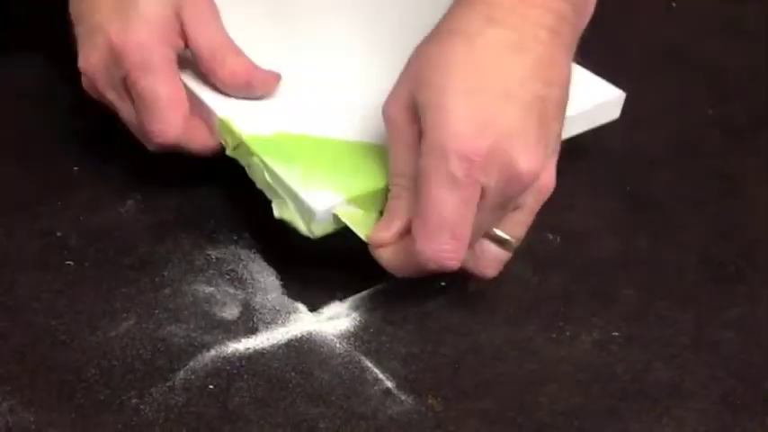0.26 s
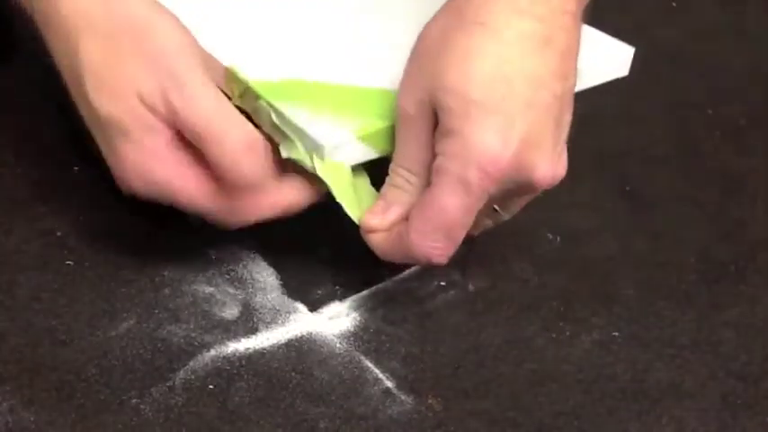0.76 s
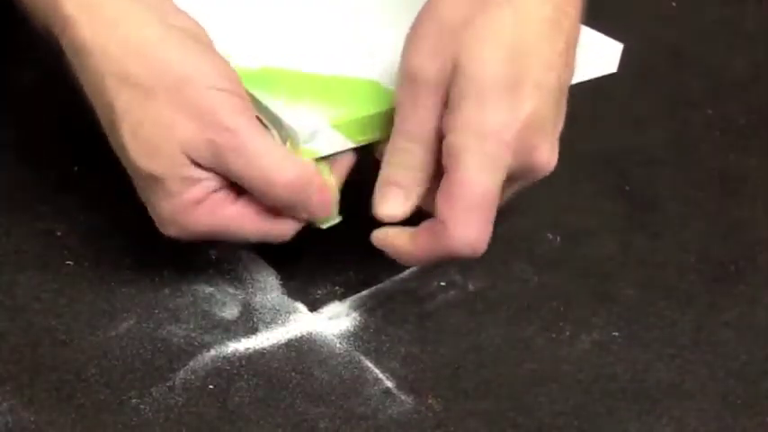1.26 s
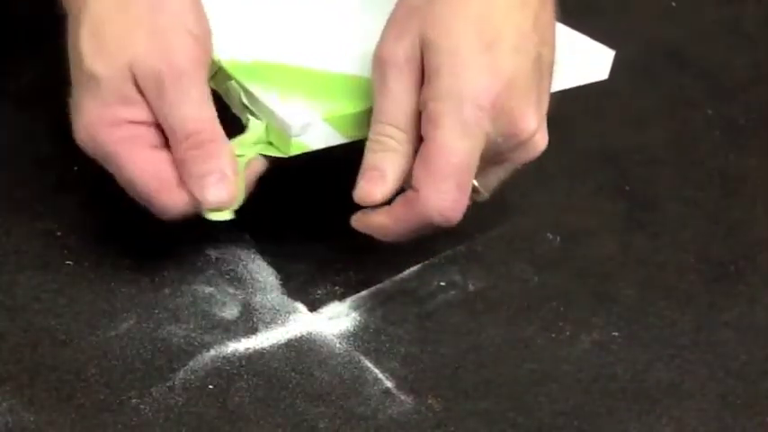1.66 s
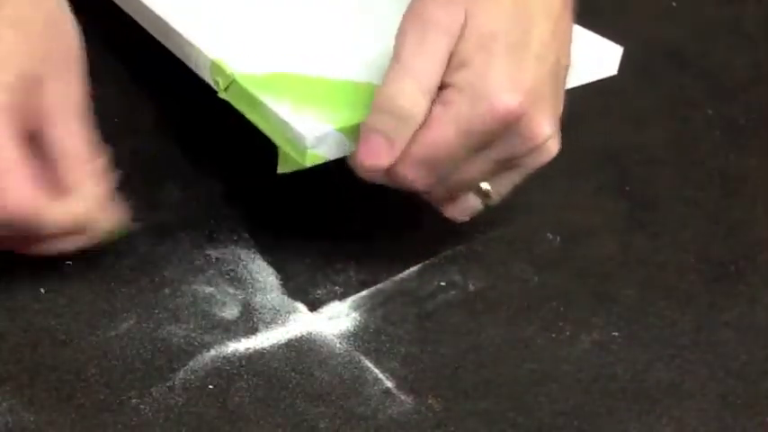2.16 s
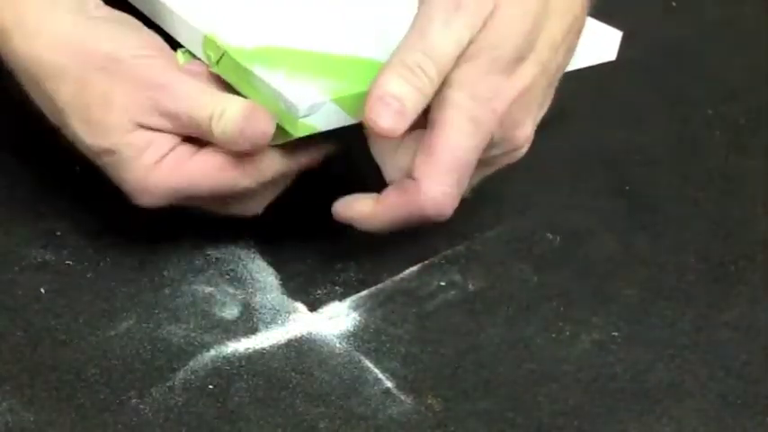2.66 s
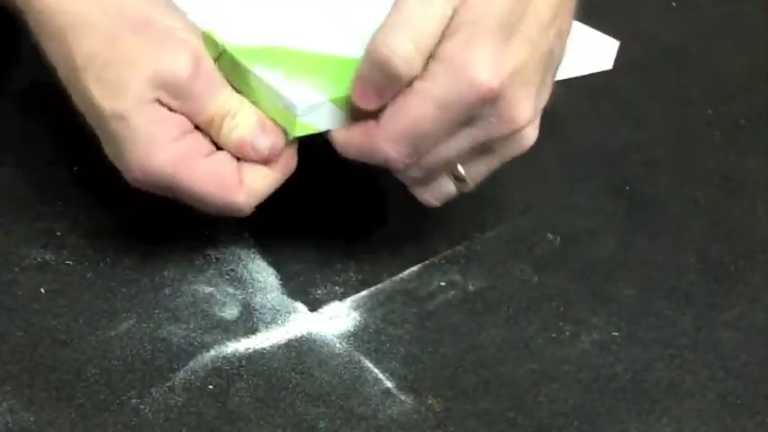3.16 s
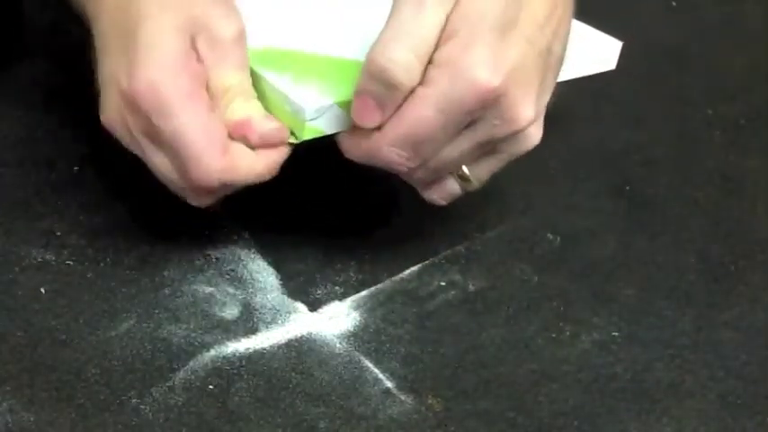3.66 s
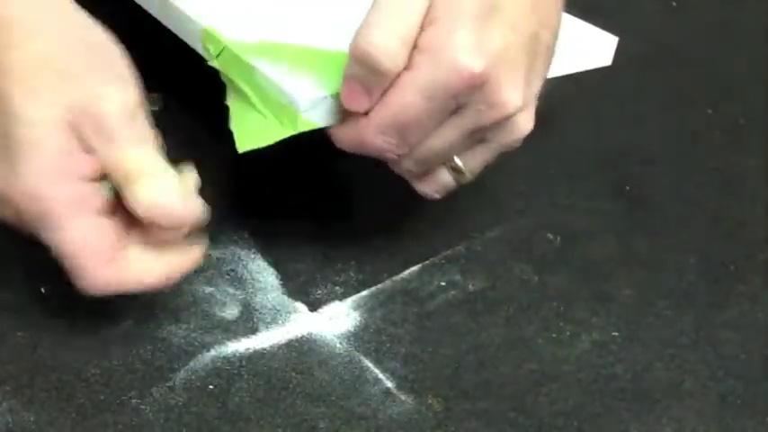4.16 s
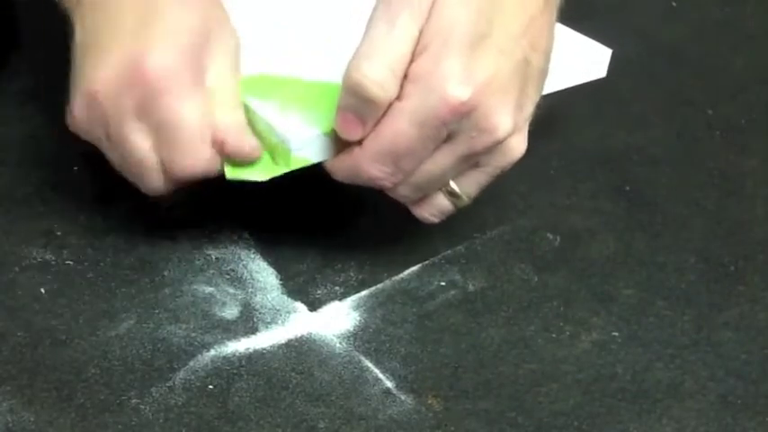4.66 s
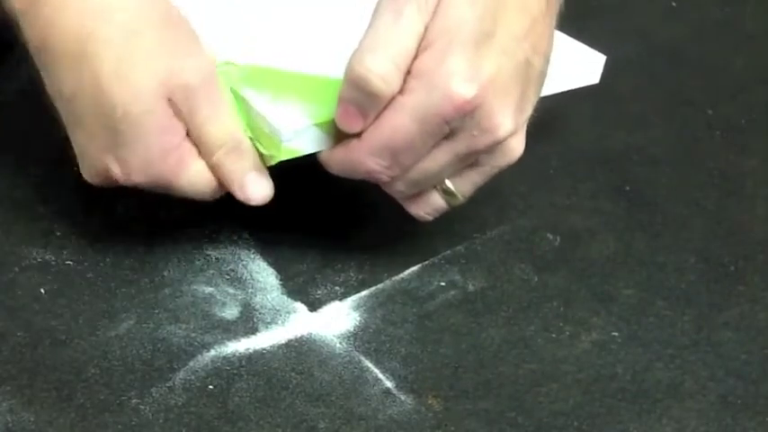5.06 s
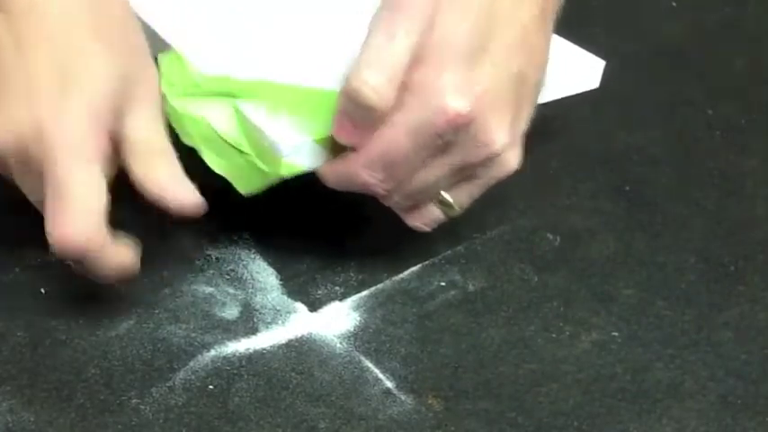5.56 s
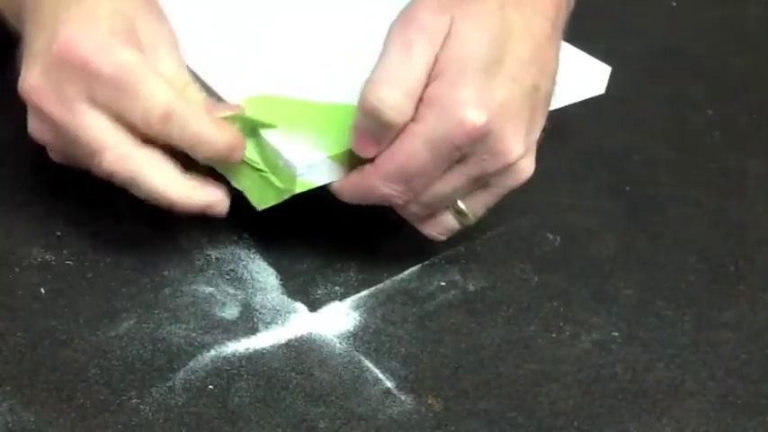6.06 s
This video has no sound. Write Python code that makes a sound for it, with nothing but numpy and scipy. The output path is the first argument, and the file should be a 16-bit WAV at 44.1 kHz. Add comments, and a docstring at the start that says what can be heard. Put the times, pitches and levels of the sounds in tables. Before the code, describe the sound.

Masking tape is picked and peeled off a board close up, short crisp rips and dry snaps, with finger rubs and dull knocks in a small room.

```python
"""Masking tape ripped off a board

Close to the microphone, tape is picked at and pulled off the corner of a board held over a workbench.
Noise grains make the rips and finger rubs; filtered bursts make the snaps, small clicks and dull knocks.
The board rings through resonators; echoes, a short tail, air noise and faint hum place it in a small workshop."""
import sys
import numpy as np
from scipy import signal
from scipy.fft import rfft, irfft
from scipy.io import wavfile
from scipy.ndimage import uniform_filter1d

SR = 44100
rng = np.random.default_rng(int(sys.argv[2]) if len(sys.argv) > 2 else 0)


def bounce(signal):
    """Save signal as a 16-bit WAV file at the path given by the first command-line argument."""
    frames = np.transpose(np.atleast_2d(signal))
    limited = np.clip(frames, -1, 1)
    pcm = np.round(limited * 32767).astype(np.int16)
    wavfile.write(sys.argv[1], SR, pcm)


N = 278712
T = np.arange(N) / SR

# Tape pulled free. Each row: moment of fastest pull in seconds, rise in seconds, fall in seconds,
# relative level in dB, brightness in dB per octave, ring of the free flap in Hz.
RIP_ROWS = [(.466, 0.056, .05, -34.5, 1, 2305), (1.414, 0.042, .03, -27, 1.5, 2240),
            (1.793, 0.051, 0.053, -21, 3, 7240), (1.91, 0.027, 0.014, -40.5, 2, 8590),
            (3.34, .05, 0.09, -41.5, 1, 2414), (4.756, 0.021, .01, -34.5, 0, 3430),
            (5.345, 0.054, 0.093, -40.5, 2, 3250), (5.503, .016, 0.011, -31, 5.5, 2780),
            (6.09, 0.034, 0.23, -47.5, -0.5, 3120)]


def amp(db):
    """Decibels to gain."""
    return 10 ** (np.asarray(db) / 20)


def evened(x):
    """Scales to an rms of 1."""
    return x / np.sqrt(np.mean(x ** 2) + 1e-20)


def read(points, hz):
    """Reads a table on a log-frequency axis."""
    f, value = np.transpose(points)
    return np.interp(np.log(hz + 1), np.log(f + 1), value)


def add(mix, s, sound):
    """Mixes a sound in at s seconds."""
    part = mix[max(round(s * SR), 0):][:len(sound)]
    part += sound[:len(part)]


def bins(size=4096):
    """Frequencies in Hz on which colours are drawn."""
    return np.fft.rfftfreq(size, 1 / SR)


def coloured(x, db):
    """Causal minimum-phase filter with the given gain over bins(), never below -90 dB."""
    both_sides = np.r_[db, db[-2:0:-1]]
    log_gain = np.log(amp(np.maximum(both_sides, -90)))
    response = np.exp(np.conj(signal.hilbert(log_gain)))
    return signal.fftconvolve(x, np.fft.ifft(response).real)


def wander(rate):
    """Smooth random motion of rms 1, mostly slower than rate in Hz."""
    spectrum = rfft(rng.standard_normal(N))
    return evened(irfft(spectrum / (1 + (bins(size=N) / rate) ** 4), N))


def paper_db():
    """The stretched strip favours its resonances and weakens its dips."""
    # Each row: centre in Hz, width in Hz, gain in dB.
    resonances = [(1690, 64, 7), (1780, 160, 2), (2670, 540, 4), (2960, 250, 1), (4030, 470, 1.5),
                  (4770, 320, -5.5), (5230, 440, 3.5), (6200, 640, 0.5), (8700, 770, 1), (9460, 810, 1)]
    return sum(db / (1 + (2 * (bins() - hz) / width) ** 2) for hz, width, db in resonances)


def flap_db(hz, db=7, octaves=0.19):
    """The loose end of the tape rings at a pitch set by its length: a peak around hz."""
    return db / (1 + (np.log2((bins() + 1) / hz) / octaves) ** 2)


def bend(x, delay_s=0.000916, slow_hz=7000):
    """Bending waves in paper are slower at low pitch, so a click arrives as a tiny falling chirp."""
    hz = bins(size=len(x))
    lag = delay_s * np.exp(-hz / slow_hz)
    phase = 2 * np.pi * np.cumsum(lag) * hz[1]
    chirp = irfft(rfft(x) * np.exp(-1j * phase), len(x))
    return chirp * np.linspace(1, 0, len(x))


def burst(decay, spike, linger=0., linger_s=0.0043, size=4096):
    """A spike, a quick flutter and a slower shiver, with the same energy in every broad band."""
    t = np.arange(size) / SR
    envelope = np.exp(-t / max(decay, 1 / SR)) + linger * np.exp(-t / linger_s)
    x = rng.standard_normal(size) * envelope
    x /= np.linalg.norm(x)
    x[0] += spike
    span = int(np.clip(size / SR / decay, 24, 100))  # bins averaged into one band
    band_power = uniform_filter1d(abs(rfft(x)) ** 2, span)
    return coloured(x, -10 * np.log10(band_power + 1e-9))[:size]


def board(x):
    """The board rings with its modes, each a narrow resonator."""
    # Each row: mode in Hz, width in Hz, relative gain in dB.
    modes = [(465, 9, -7.5), (582, 32, -10.5), (603, 24, -33), (804, 45, -9), (1013, 40.5, 6.5),
             (1243, 31, 1), (1369, 43, -1)]
    return sum(amp(db) * signal.lfilter(*signal.iirpeak(hz, hz / width, SR), x) for hz, width, db in modes)


def snaps(rows, spike=0.17, tape_db=-2.0, thud_db=-4.5, bass_db=-19):
    """Each slip of the taut tape cracks the paper and jolts the board."""
    tape, jolts = np.zeros(N), np.zeros(N)
    bob = flap_db(201, db=4, octaves=0.93)  # the board bobs in the hand
    body = paper_db() + bob
    for s, db, low, top, flap_hz, flutter_s in rows:
        crack = amp(db) * bend(burst(flutter_s, spike, linger=0.39))
        mid = -3.5 + 0.65 * low  # a harder jolt is also fuller near 2 kHz
        tone = [(50, low + bass_db - 0.5), (250, low + bass_db), (550, low + thud_db), (1100, low + thud_db),
                (2000, mid), (3600, 0), (5500, 0), (9000, top), (15000, top - 2)]
        add(tape, s, coloured(crack, read(tone, bins()) + body + flap_db(flap_hz)))
        add(jolts, s, amp(low) * crack)
    return amp(tape_db) * tape + board(jolts)


def strokes(rows, tone, per_s, spread_db, hiss, judder_db, ring_db, bluntness):
    """Threads of glue or paper grain let go one by one, louder and denser with the speed of the hand."""
    out, colour = np.zeros(N), read(tone, bins()) + paper_db()
    judder = amp(judder_db * wander(210))  # the slip is never even
    sizes = amp(spread_db * np.minimum(rng.exponential(1, N), 3)) * rng.choice([-1, 1], N)
    chance, fizz = rng.random(N), rng.standard_normal(N)
    for s, rise, fall, db, bright, ring_hz in rows:
        near = (T > s - 2 * rise) & (T < s + 2 * fall)
        t = T[near] - s
        speed = amp(-20 * np.maximum(-t / rise, t / fall) ** bluntness)  # 20 dB down after rise or fall
        let_go = chance[near] < per_s * speed ** .3 / SR
        grains = evened(sizes[near] * let_go) + hiss * fizz[near]
        grains = grains * judder[near] * speed
        grains *= np.linalg.norm(speed) / np.linalg.norm(grains)
        tilt = bright * np.log2(np.maximum(bins(), 1000) / 5000)
        tilted = colour + flap_db(ring_hz, db=ring_db) + tilt
        tilted = tilted - 10 * np.log10(np.mean(amp(tilted) ** 2))  # colour alone adds no level
        add(out, T[near][0], amp(db) * coloured(grains, tilted))
    return out


def slips(rows, per_s, over_db, flutter_s):
    """Chance snaps during strokes, one somewhere in every interval, stronger when the hand is fast."""
    scatter_db, board_db, treble_db = 0.5, -3.5, 2
    centre_hz, spread_octaves = 7930, 0.57  # ring of the flap, spread either way
    found = []
    for s, rise, fall, db, bright, _ in rows:
        grid = np.arange(-rise, fall, 1 / per_s)
        place, size, pitch = rng.random((len(grid), 3)).T
        t = grid + place / per_s
        scatter = scatter_db * np.log(size / (1 - size)) / 2
        strength = db + over_db - 20 * np.maximum(-t / rise, t / fall) + scatter
        flap_hz = centre_hz * 2 ** (spread_octaves * (2 * pitch - 1))
        for dt, level, hz in zip(t, strength, flap_hz):
            found.append((s + dt, level, board_db, treble_db + bright, hz, flutter_s))
    return found


def room_tone(waver=0.57, drift=0.72):
    """Air noise of slowly changing level under a hum whose tones waver in level and phase."""
    # Each row: frequency in Hz, relative gain in dB.
    air_colour = [(30, -16), (60, -10), (100, -11), (135, -1), (240, -4), (325, -3.5), (420, -4.5),
                  (780, -7), (980, -6), (1200, -6), (1900, -14), (2700, -13), (4500, -16.5), (15000, -18.5)]
    # Each row: time in seconds, air level in dB around which it wanders.
    air_level = [(0, -51.5), (.4, -56.5), (2, -61.5), (3.2, -58), (4.2, -60.5), (5.2, -62), (6.32, -57)]
    # Each row: hum tone in Hz, rms level in dB.
    hum_tones = [(121, -71.5), (195, -70), (322, -74), (1000, -77)]
    spectrum = rfft(rng.standard_normal(N)) * amp(read(air_colour, bins(size=N)))
    air = evened(irfft(spectrum, N))
    hum = np.zeros(N)
    for hz, db in hum_tones:
        tone = np.sin(2 * np.pi * hz * T + drift * wander(7.2))
        hum += amp(db) * evened((1 + waver * wander(3.3)) * tone)
    return air * amp(np.interp(T, *np.transpose(air_level)) + 1.06 * wander(2.2)) + hum


def slides():
    """Fingers sliding on tape and board, each slide split into speeding up and slowing down."""
    # Each row: moment of fastest slide in seconds, length in seconds, relative level in dB,
    # brightness in dB per octave, ring of the rubbed spot in Hz.
    slide_rows = [(0.023, 0.078, -55, -1, 900), (.125, 0.097, -48.5, -1.5, 6500),
                  (.52, 0.58, -55, 1.5, 1010), (0.644, 0.064, -51, 0, 1700), (0.932, 0.15, -49.5, -3, 1870),
                  (1.274, 0.23, -48, 7, 7050), (1.608, 0.094, -49, 4.5, 5600),
                  (2.131, 0.078, -45.5, 1, 2400), (2.407, 0.29, -51, 2, 3070),
                  (2.789, 0.093, -54.5, 2, 6650), (3.134, 0.09, -58, 1, 7000),
                  (3.421, 0.063, -47, -0.5, 2780), (3.559, 0.042, -53, -2.5, 3170),
                  (3.644, 0.087, -45, -.5, 3040), (4.034, 0.11, -51, -0.5, 6000),
                  (4.477, 0.057, -54.5, 2, 1020), (4.588, 0.2, -55, 3, 3500),
                  (4.714, 0.073, -44.5, 8.5, 10040), (4.844, 0.39, -53.5, 3.5, 6980),
                  (5.113, 0.2, -51, .5, 3180), (5.48, 0.042, -43.5, 1, 3180), (6.113, 0.23, -41.5, 2, 3260),
                  (6.27, 0.26, -49.5, 0, 3220)]
    rise_share = .45  # part of a stroke spent speeding up
    return [(s, length * rise_share, length * (1 - rise_share), *tone) for s, length, *tone in slide_rows]


def rubs():
    """Sliding fingers free the paper grain in dense, hissing strokes."""
    # Each row: frequency in Hz, relative gain in dB.
    rub_colour = [(60, -62), (400, -19.5), (1000, -13), (1800, -9), (2800, -1), (4500, 2), (7000, 0),
                  (11000, -3), (15000, -2)]
    return amp(-1.5) * strokes(slides(), rub_colour, per_s=2500, spread_db=-0.5, hiss=0.73,
                               judder_db=4.5, ring_db=7.0, bluntness=2.72)


def crinkles():
    """Small snaps under the sliding fingers."""
    return snaps(slips(slides(), per_s=30, over_db=23, flutter_s=0.0017))


def knocks(spike=0.43, ring_db=-2, push_db=2):
    """Soft blows of hands and board: a low push with a short rattle, and the board's ring."""
    # Each row: time in seconds, relative strength in dB, centre in Hz, width in octaves.
    blows = [(.006, -4, 178, 1.04), (.174, 0.5, 520, 0.93), (0.177, 6, 212, 0.55), (.199, -5.5, 393, 0.81),
             (1.418, -1, 154, 1), (1.873, -11, 1060, 0.51), (2.619, -8, 680, 1.1), (3.172, -7.5, 727, 1.3),
             (3.336, 0.5, 214, 1.04), (4.057, 12, 620, 0.47), (4.273, 2.5, 850, 1.43),
             (4.293, -0.5, 720, 1.16), (4.324, -2, 724, 0.88), (4.338, 5, 308, 1.07),
             (4.671, -5.5, 196.5, 0.81), (4.751, -2, 152, 1.3), (5.505, 6.5, 890, 0.14),
             (6.078, -6.5, 860, 0.5)]
    out = np.zeros(N)
    for s, db, hz, octaves in blows:
        away = np.log2((bins() + 1) / hz)  # octaves from the centre
        hump = -20 * np.log10(1 + (away / octaves) ** 2) - away ** 2
        rattle_s = 0.013 * np.sqrt(523.5 / hz)  # lower knocks rattle longer
        add(out, s, amp(db) * coloured(burst(rattle_s, spike), hump))
    return amp(push_db) * out + amp(ring_db) * board(out)


def tape_snaps():
    """Single snaps of the taut tape, each a crack with a jolt of the board."""
    # Each row: time in seconds, relative strength in dB, board's share in dB, treble share in dB,
    # ring of the free flap in Hz, decay of the paper flutter in seconds.
    snap_rows = [(.4435, -5, -1, -3, 8800, 0.00097), (.4635, 2.5, -4.5, -12, 6800, .0011),
                 (.4856, -6.5, -3, 2.5, 10300, .004), (.647, -18, 0, -2, 13600, 0.002),
                 (1.2357, -14.5, -4, -5, 9300, .0015), (1.2437, -13, 1.5, 0.5, 9270, 0.00037),
                 (1.3732, -8, -1.5, 0, 9300, .0013), (1.3884, -7, 6, 3, 7200, .0005),
                 (1.414, 6.5, -3.5, -31, 2660, 0.0032), (1.7172, -12.5, -6, 5, 12300, 0.00037),
                 (1.732, -23, -12, 13, 8900, .0004), (1.745, -6.5, -13, 10, 13700, .0003),
                 (1.8959, -16, -21, 4.5, 8440, .0003), (2.115, -18, 0, -13, 2440, 0.00062),
                 (2.3884, -14.5, -7, -4, 11140, .0016), (3.0058, -27.5, 6, 12.5, 11700, 0.00098),
                 (3.0428, -31.5, 3, 13.5, 11500, .0009), (3.1063, -30, 12, 5, 10600, .0004),
                 (3.1732, -11.5, -10, 1.5, 11900, 0.0038), (3.2942, -9.5, -1.5, -3.5, 8900, 0.0024),
                 (3.3346, 3, -1.5, -6, 9700, 0.0015), (3.407, -9.5, -4.5, -5, 5070, .0011),
                 (3.602, -10, -12, -4, 3200, .0027), (3.6225, 3, 6.5, -1.5, 12300, 0.0019),
                 (3.6814, 12.5, -2, -5.5, 4000, .0011), (3.7364, 10.5, -1, -2.5, 4150, 0.00077),
                 (3.8019, 12.5, -15, -2.5, 5700, 0.00054), (4.0323, -4.5, 6.5, -4, 9300, 0.004),
                 (4.0559, 4, 4.5, -10, 3480, 0.001), (4.2674, -11, 14.5, -16, 2290, 0.0019),
                 (4.7375, -19, 25.5, -20, 9300, .0023), (4.751, -6.5, 12, 3.5, 10460, 0.0015),
                 (4.912, -8.5, 5, 7, 9000, 0.00028), (4.928, -8, -5, -1, 5940, 0.00021),
                 (4.9535, -13, 0, -2, 9400, .00085), (4.9625, -7, 0, -38, 2330, 0.0027),
                 (5.0851, -6.5, -4, -10, 3380, 0.0015), (5.1097, -5.5, -8, -7, 3160, .0008),
                 (5.1662, -19, -18, -3, 5530, .0004), (5.3234, -2.5, -11, 0.5, 2920, 0.0034),
                 (5.3512, -10, -21, 0, 8800, 0.0007), (5.4817, -11.5, -4, -3, 8860, 0.00046),
                 (5.4992, -3, -1, 1, 5420, 0.0019), (5.5044, 4, 7, 1, 2800, 0.00063),
                 (5.5584, -1.5, 0.5, -10, 3750, .0009), (5.9367, -20.5, 4, -4.5, 5900, .001),
                 (6.0418, -24, -8, 5.5, 10700, .0009), (6.1055, -10.5, -12, -20, 3570, 0.00054)]
    return snaps(snap_rows)


def rips():
    """The tape is pulled free as threads of glue let go in quick succession."""
    # Each row: frequency in Hz, relative gain in dB.
    rip_colour = [(60, -42), (200, -44.5), (450, 3.5), (1000, -14), (1500, -4.5), (2700, -0.5), (4500, 0.5),
                  (6700, 2.5), (9000, -7), (15000, -1)]
    return amp(-1.0) * strokes(RIP_ROWS, rip_colour, per_s=2000, spread_db=4.5, hiss=.3,
                               judder_db=2, ring_db=6, bluntness=1.3)


def catches():
    """The glue catches and gives way during a rip, in runs of tiny snaps."""
    return snaps(slips(RIP_ROWS, per_s=150, over_db=21.5, flutter_s=0.00052), spike=0.67)


def workshop(x, early_db=-11, early_s=0.0062, tail_db=-15.0):
    """Quick echoes off bench and hands, then the room's short tail."""
    # Each row: frequency in Hz, time in seconds for the tail to fall 60 dB.
    tail_times = [(150, 0.88), (600, 0.28), (1000, 0.19), (1800, 0.23), (4000, 0.18), (8000, 0.2),
                  (15000, 0.15)]
    t = np.arange(SR // 2) / SR
    early = rng.standard_normal(len(t)) * (t > .001) * np.exp(-t / early_s)
    hz, frame_s, z = signal.stft(rng.standard_normal(len(t)), SR, nperseg=256)
    fading = z * amp(-60 * frame_s / read(tail_times, hz)[:, None])
    tail = signal.istft(fading, SR)[1][:len(t)]
    tail *= np.clip((t - .004) / 0.0096, 0, 1)  # the tail fades in behind the echoes
    echo = amp(early_db) * early / np.linalg.norm(early) + amp(tail_db) * tail / np.linalg.norm(tail)
    return x + signal.fftconvolve(x, echo)[:N]


def scene():
    """Tape, fingers and board sound in the workshop, over its air noise and hum."""
    fingers = rubs() + crinkles() + knocks()
    tape = tape_snaps() + rips() + catches()
    return (workshop(fingers + tape) + room_tone())[None]


def record(dry):
    """The microphone rounds off the hardest snaps and sheds deep bass; then the band limit."""
    ceiling, bass_hz, edge_hz = .75, 75, 15450
    rounded = ceiling * np.tanh(dry / ceiling)
    thin = signal.sosfilt(signal.butter(4, bass_hz, "high", fs=SR, output="sos"), rounded)
    band_limit = signal.firwin(401, edge_hz, window=("kaiser", 8), fs=SR)
    return signal.oaconvolve(thin, band_limit[None], "same")


dry = scene()
out = record(dry)
bounce(out)
```